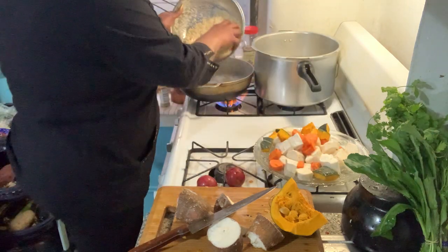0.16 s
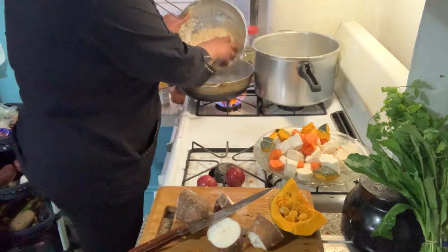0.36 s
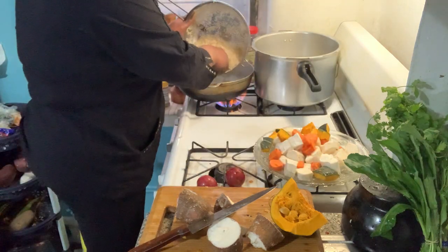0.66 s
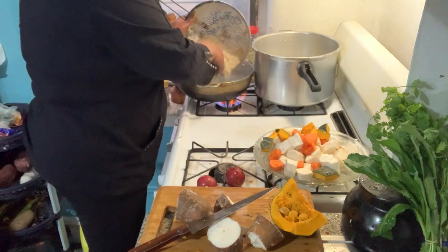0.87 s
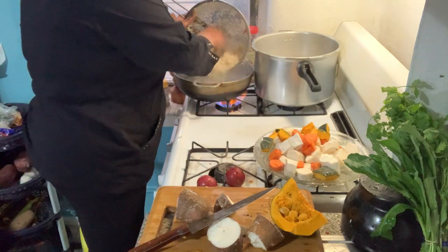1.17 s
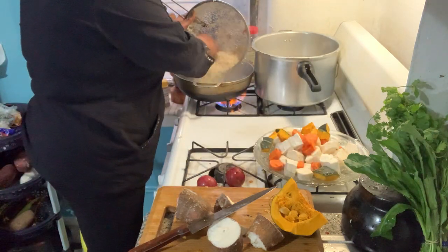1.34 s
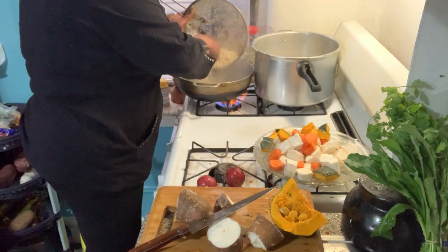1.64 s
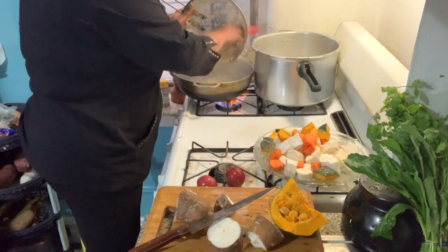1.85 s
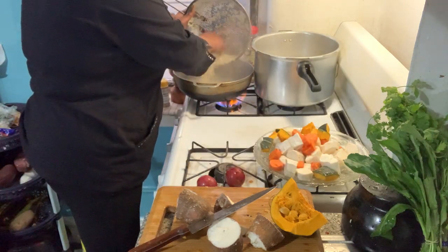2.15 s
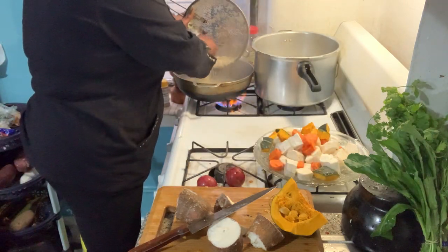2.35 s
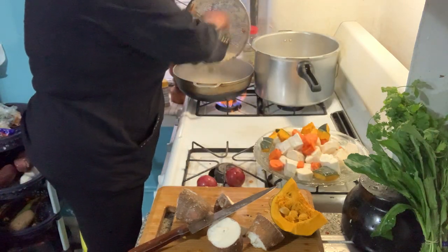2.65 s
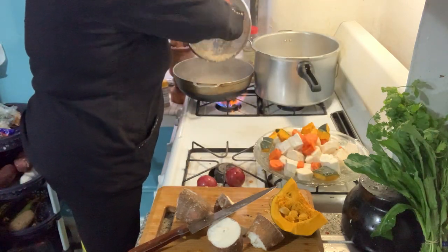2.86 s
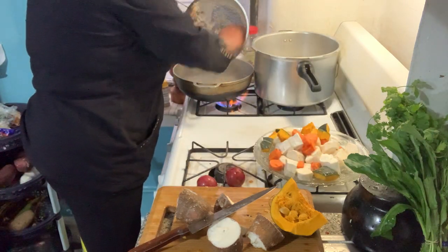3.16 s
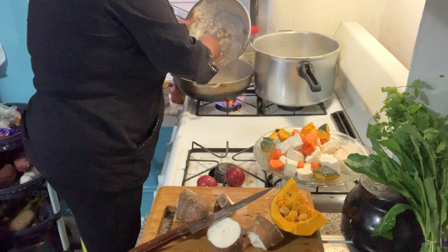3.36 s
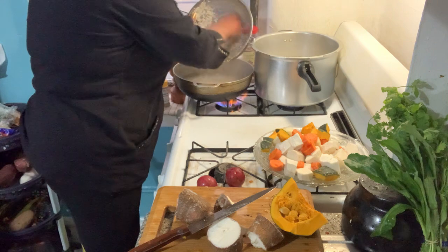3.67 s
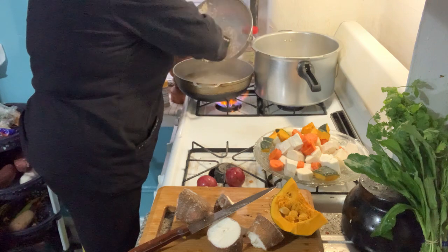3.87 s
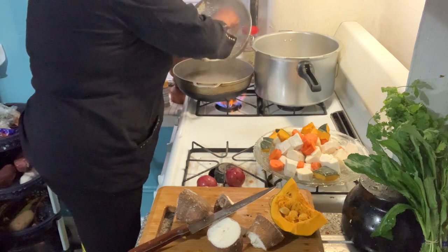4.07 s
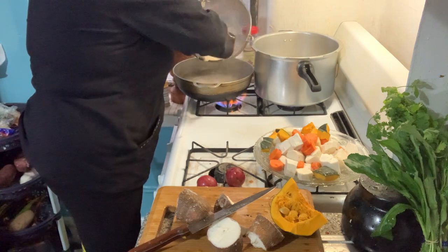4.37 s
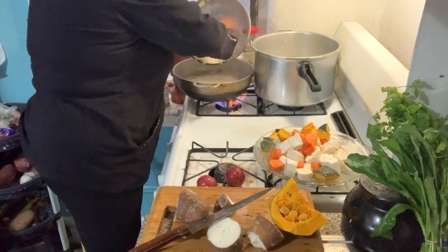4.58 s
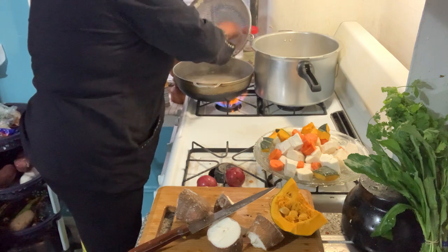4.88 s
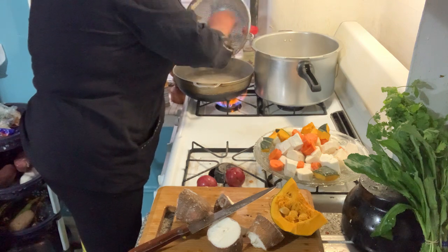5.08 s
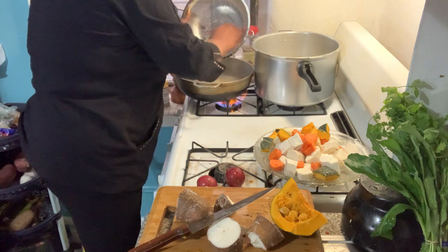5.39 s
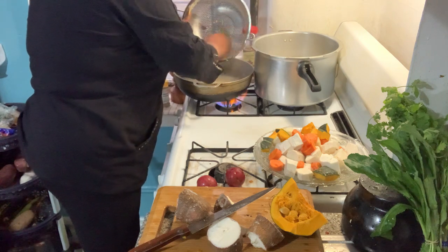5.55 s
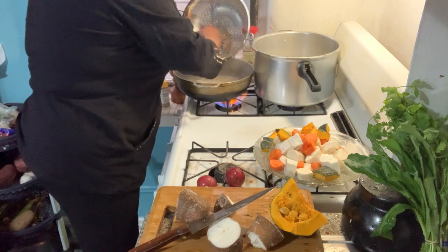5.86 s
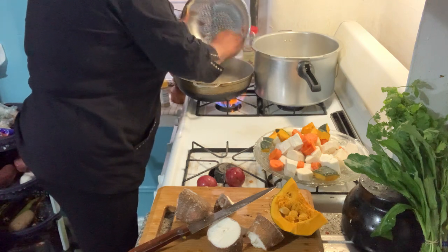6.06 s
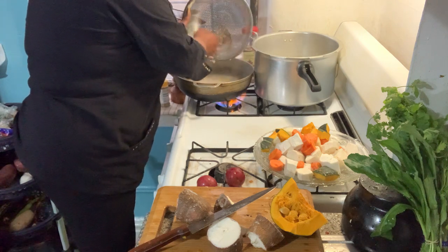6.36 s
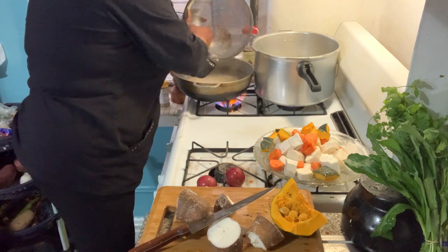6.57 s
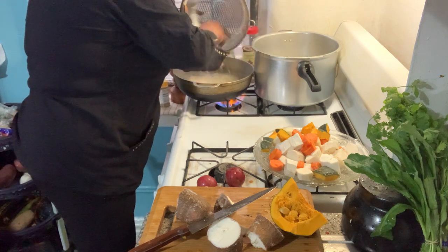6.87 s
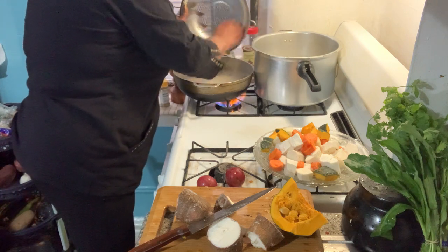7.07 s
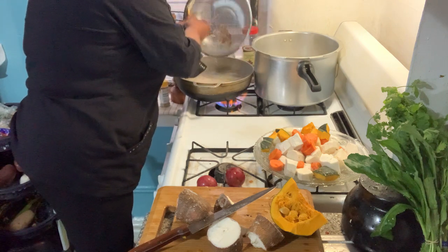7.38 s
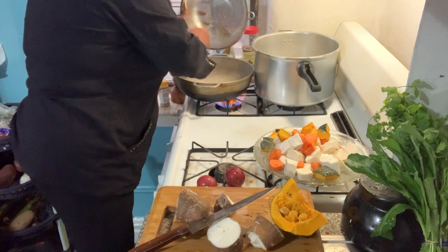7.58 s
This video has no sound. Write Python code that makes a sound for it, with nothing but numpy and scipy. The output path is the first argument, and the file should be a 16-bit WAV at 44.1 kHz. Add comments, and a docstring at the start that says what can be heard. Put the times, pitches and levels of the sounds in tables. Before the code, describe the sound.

Fingers scrape wet rice over a steel mesh strainer in gritty strokes, with wire pings and metallic rim knocks, over a kitchen fan drone and gas hiss.

```python
"""In a hard-walled kitchen a fan drones and whines and a gas flame hisses, all shaped noise and thin tones.
From the start fingers scrape wet rice over a steel mesh strainer above a pan: gritty noise swells stroke by
stroke, dry as if close to the microphone; caught wires ping. Near 3 s the rim knocks, near 6 s it clanks on
the pan: resonances with wall echoes, over soft booms. Near 7 s a wet finger squeaks in harmonics.
The two microphone ports hear deep bass and treble mostly alike but phase-shifted, the middle less alike."""
import sys
import numpy as np
from scipy import signal
from scipy.fft import rfft, irfft, next_fast_len
from scipy.io import wavfile
from scipy.ndimage import uniform_filter1d, map_coordinates

SR = 44100
rng = np.random.default_rng(int(sys.argv[2]) if len(sys.argv) > 2 else 0)


def digitize_waveform(pressure):
    """Quantize a signal to 16-bit integers and store it at the path in sys.argv[1].

    Rows of a 2-D input are taken as channels; values are limited to [-1, 1].
    """
    field = np.atleast_2d(pressure).T
    bounded = np.clip(field, -1, 1)
    quanta = np.round(bounded * 32767).astype(np.int16)
    wavfile.write(sys.argv[1], SR, quanta)


N = 340893

# spectrum of the mesh wires: f/Hz, relative level per Hz/dB
WIRE_FIZZ = [(5000, -11), (7000, -15), (8500, -4.5), (10500, -1), (11500, -2), (12500, -3.5), (13200, -11),
             (14700, -12), (15700, -58)]
# spectrum of the bowl and rice: f/Hz, relative level per Hz/dB
BOWL_RASP = [(1200, -4.5), (2400, -11.5), (3200, -5), (3900, -3.5), (4600, -1), (6000, -2.5), (7200, -5.5),
             (9000, -3.5)]


def amp(db):
    """Gain of a level in dB."""
    return 10 ** (np.asarray(db) / 20)


def unit(x):
    """x at rms 1."""
    return x / np.sqrt(np.mean(x ** 2) + 1e-20)


def along(points, hz):
    """One value per frequency for each column after the Hz, on a log axis."""
    f, *cols = np.transpose(points)
    return np.squeeze([np.interp(np.log(hz + 1), np.log(f + 1), c) for c in cols])


def curves(rows):
    """One value per sample for each column after the time."""
    s, *cols = np.transpose(rows)
    return [np.interp(np.arange(N) / SR, s, c) for c in cols]


def wobble(rate):
    """A smooth random curve, rate knots a second."""
    knots = rng.standard_normal(int(N * rate / SR) + 4)
    return map_coordinates(knots, [np.arange(N) * rate / SR])


def filtered(x, response):
    """x times a complex response of frequency."""
    n = x.shape[-1]
    m = next_fast_len(n + SR // 2)
    return irfft(rfft(x, m) * response(np.fft.rfftfreq(m, 1 / SR)), m)[..., :n]


def coloured(x, spectrum):
    """x given a spectrum closed at both ends, at rms 1."""
    closed = [(spectrum[0][0] / 2, -120), *spectrum, (SR / 2, -120)]
    return unit(filtered(x, lambda hz: amp(along(closed, hz))))


def body(modes):
    """The causal response of a set of (f/Hz, width/Hz, level/dB) resonances, alternating in sign."""
    def response(f):
        total = 0
        for k, (centre, width, db) in enumerate(modes):
            resonance = 1j * f * width / (centre * centre - f * f + 1j * f * width)
            total = total + (-1) ** k * amp(db) * resonance
        return total
    return response


def grit(spread_db, patchy_db):
    """Two streams of tiny slips of unequal size, in patches of random strength."""
    slips = rng.standard_normal((2, N)) * amp(spread_db * rng.standard_normal(N))
    z = signal.stft(slips, nperseg=256)[2]
    field = rng.standard_normal(z.shape[1:])
    field = uniform_filter1d(uniform_filter1d(field, 5, 0), 8, 1)  # smooth over frequency, then time
    return signal.istft(z * amp(patchy_db * unit(field)), nperseg=256)[1][:, :N]


def echoes(x):
    """Two unrelated answers of the kitchen walls: noise tails in which each frequency dies at its own speed."""
    # decay between the hard walls: f/Hz, t60/s
    wall_decay = [(500, 0.41), (2000, 0.3), (5000, 0.34), (8000, 0.26), (11000, 0.2), (14000, 0.053)]
    hz, t, z = signal.stft(rng.standard_normal((2, SR // 2)), SR, nperseg=256)
    fade = amp(-60 * t / along(wall_decay, hz)[:, None])
    tail = signal.istft(z * fade, SR, nperseg=256)[1]
    return signal.fftconvolve(x, tail / np.linalg.norm(tail[0]), axes=1)


def kitchen():
    """Fan noise and tones in the room modes, deep rumble, patchy flame hiss and narrow flickering bands."""
    # fan in the room modes: f/Hz, relative level per Hz/dB
    drone_spectrum = [(25, -39), (45, -20), (60, -5.5), (80, -23), (110, 1), (150, 3), (200, -6),
                      (260, -3.5), (340, 2.5), (400, -9), (560, -14.5), (620, -64), (680, -3.5),
                      (1000, -34)]
    # gas flame: f/Hz, relative level per Hz/dB
    flame_spectrum = [(600, 10), (1000, 1), (2000, -2.5), (3000, -5), (5000, -10.5), (7300, -13),
                      (11000, -21), (13200, -38), (15500, -79)]
    # mean level of the deepest bass: t/s, level/dB
    rumble_level = [(0, -57.5), (1.2, -53.5), (2.5, -54), (3.7, -52.5), (5.5, -56), (6.5, -54.5),
                    (7.73, -60)]
    # narrow bands of the room tone that flicker: f/Hz, width/Hz, mean level/dB
    burble_bands = [(446, 40, -66), (573, 43, -63.5), (747, 49, -63.5), (793, 15, -65.5), (947, 15, -68.5)]
    # blurred fan tones: f/Hz, width/Hz, level/dB
    hum_bands = [(95, 8, -58), (245, 10, -57), (283, 6, -52), (353, 5, -58), (706, 5, -55)]
    # two thin fan tones: t/s, mean level of the lower/dB, of the upper/dB
    whine_level = [(0, -71, -60), (1, -64.5, -65), (2.5, -68, -62), (3.2, -59, -76), (6.8, -59.5, -61),
                   (7.73, -65, -60.5)]
    # their pitches: f/Hz
    whine_hz = [2076, 2160]

    def noise():
        return rng.standard_normal((2, N))

    def band(hz, width_hz):
        return unit(filtered(noise(), body([(hz, width_hz, 0)])))

    drone = amp(-46 + .6 * wobble(3.94)) * coloured(noise(), drone_spectrum)
    deep_bass = coloured(noise(), [(30, -13), (55, 6.0), (75, 1.0)])
    rumble = amp(curves(rumble_level)[0] + 0.56 * wobble(3.64)) * deep_bass
    hiss = coloured(grit(spread_db=1.5, patchy_db=2.5), flame_spectrum)
    flame = amp(-53.0 + 0.32 * wobble(2.2)) * hiss
    burble = sum(amp(db + 5.1 * wobble(7)) * band(hz, width_hz) for hz, width_hz, db in burble_bands)
    hum = sum(amp(db) * band(hz, width_hz) for hz, width_hz, db in hum_bands)
    t = np.arange(N) / SR
    whine = 0
    for hz, db in zip(whine_hz, curves(whine_level)):
        phase = 2 * np.pi * hz * t + .8 * wobble(4) + [[0], [2]]  # 2 rad between the rows
        whine = whine + amp(db + wobble(4)) * np.sin(phase)
    return drone + rumble + flame + burble + hum + whine


def effort():
    """Amplitude of fizz and rasp: each stroke swells to its fastest moment and dies away; powers add."""
    # strokes of the hand over the mesh: fastest moment t/s, rise/s, fall/s, fizz level/dB, rasp over fizz/dB
    hand_strokes = [(.2, 0.16, 0.37, -56, -4.5), (.42, .04, 0.091, -58, -14), (.57, .04, 0.1, -56, -14),
                    (.72, 0.097, 0.49, -51.5, -2.5), (.96, 0.086, 0.16, -51, 1),
                    (1.15, 0.28, 0.12, -54, -23), (1.33, 0.071, 0.12, -50, -7),
                    (1.54, 0.11, 0.13, -46.5, -2.5), (1.82, 0.026, 0.052, -48.5, -18),
                    (2.15, 0.17, 0.15, -46.5, -3.5), (2.33, 0.046, 0.065, -46, -2),
                    (2.45, 0.089, 0.13, -43, -0.5), (2.62, 0.11, 0.073, -45.5, -4),
                    (2.775, 0.045, 0.023, -52, -9), (2.9, 0.047, 0.17, -53, -10),
                    (3.01, 0.049, 0.034, -43.5, -18), (3.08, 0.087, 0.061, -40.5, -7.5),
                    (3.22, 0.063, 0.14, -34, -15.5), (3.31, 0.068, 0.093, -44.5, 0.5),
                    (3.53, 0.052, 0.083, -47, -14), (3.61, 0.059, 0.037, -46, -10),
                    (3.74, 0.055, 0.16, -40, -12), (3.85, .1, 0.14, -42, -16),
                    (3.94, 0.076, 0.072, -40, -12), (4.11, 0.016, 0.1, -45.5, -24),
                    (4.28, 0.1, 0.22, -39.5, -10.5), (4.448, 0.057, 0.02, -62, -16),
                    (4.53, .05, 0.033, -72, -11), (4.69, 0.25, 0.075, -44, -11),
                    (4.955, 0.086, 0.078, -43.5, -8.5), (5.1, 0.065, 0.033, -61, 1),
                    (5.16, 0.022, 0.028, -57, 3), (5.3, 0.089, 0.088, -38.5, -11),
                    (5.6, 0.035, 0.072, -43, -5.5), (5.7, 0.078, 0.042, -53.5, -4),
                    (5.85, 0.023, 0.05, -49, -11), (6.06, .04, 0.036, -65, -9), (6.42, 0.22, 0.1, -47.5, 1),
                    (6.65, 0.11, 0.058, -45.5, 0), (6.79, 0.1, 0.09, -42.5, -2),
                    (7.02, 0.012, 0.039, -53, -4), (7.14, 0.029, .05, -55.5, -1),
                    (7.22, 0.088, 0.079, -46, -4.5), (7.3, .06, .08, -46.5, -2),
                    (7.4, .06, 0.065, -58, -10), (7.35, .02, 0.022, -58, 5), (7.545, 0.035, 0.058, -47, -3),
                    (7.69, .02, .04, -54, -13)]
    # rice shifting between strokes: t/s, fizz level/dB
    settling = [(0, -66.5), (.7, -65), (1.75, -50.5), (1.9, -64.5), (2.7, -62), (3.5, -62.5), (5.5, -57),
                (6.3, -58), (7, -72.5), (7.73, -73)]
    settle_rasp_db = -1  # rasp over the fizz between strokes
    edge_db, roundness = 12.5, 1.29  # drop at the ends of a stroke's rise and fall; shape of its top
    t = np.arange(N) / SR
    power = amp(2 * (curves(settling)[0] + [[0], [settle_rasp_db]]))
    for s, rise, fall, fizz_db, rasp_db in hand_strokes:
        start = max(round((s - 3 * rise) * SR), 0)
        near = slice(start, round((s + 3 * fall) * SR))
        away = np.abs(t[near] - s) / np.where(t[near] < s, rise, fall)
        peak_db = fizz_db + np.array([[0], [rasp_db]])
        power[:, near] += amp(2 * (peak_db - edge_db * away ** roundness))
    return np.sqrt(power)


def scrape():
    """Skin and grains slip over the weave: the wires fizz, the bowl rasps, both stutter together, grains tick."""
    # what a grain rings in the wires: f/Hz, width/Hz, level/dB
    wire_modes = [(3980, 920, -0.5), (4660, 170, 7.5), (5800, 400, 4), (6470, 400, 5)]
    ticks_per_s, tick_db, tick_spread_db = 300, -7, 3.5  # mean rate; level against the rasp effort; spread
    fizz, rasp = effort()
    stutter = wobble(60)
    hits = rng.random(N) < ticks_per_s / SR
    sizes = amp(tick_spread_db * rng.standard_normal(N))
    snaps = hits * sizes * np.sign(rng.standard_normal((2, N)))
    fizz_noise = coloured(grit(spread_db=0.5, patchy_db=2.5), WIRE_FIZZ)
    rasp_noise = coloured(grit(spread_db=0.5, patchy_db=0.5), BOWL_RASP)
    wires_fizz = fizz * amp(1.14 * stutter) * fizz_noise
    bowl_rasps = rasp * amp(2 * stutter + 2.0 * wobble(18)) * rasp_noise
    grains_tick = rasp * amp(tick_db) * unit(filtered(snaps, body(wire_modes)))
    return wires_fizz + bowl_rasps + grains_tick


def catches():
    """A nail or grain catches: each plucks one wire and throws a brief scuff of fizz and rasp."""
    # nails and grains on a wire: t/s, ping drive level/dB, ping f/Hz, scuff level/dB
    caught_wires = [(0.683, -41, 6400, -44), (0.792, -34, 4150, -36.5), (0.838, -35, 5200, -43),
                    (.936, -22.5, 5400, -49), (0.941, -23.5, 4650, -60), (0.99, -36, 5600, -49),
                    (1.066, -34, 6000, -43), (1.244, -51, 4860, -43), (1.329, -33, 3600, -47),
                    (1.485, -40, 5200, -42), (1.555, -34, 5600, -42), (1.673, -33, 4200, -45),
                    (1.808, -48, 4400, -54), (2.316, -28.5, 6000, -38), (2.43, -21, 4600, -36.5),
                    (2.719, -32, 5260, -57), (2.769, -45, 6100, -41), (3.78, -34, 4350, -30),
                    (4.082, -55, 5350, -40), (4.403, -50, 4370, -51), (4.601, -20, 4290, -28.5),
                    (5.148, -38, 6100, -41), (5.591, -31, 6060, -33), (5.829, -40.5, 4800, -55),
                    (6.039, -45, 6020, -57), (6.421, -41, 4600, -37), (6.615, -32, 3900, -48),
                    (6.749, -29, 5760, -48), (7.013, -30, 4900, -45), (7.135, -32, 4800, -48),
                    (7.345, -42, 4890, -37), (7.536, -33, 4550, -50)]
    t60_s, scuff_rasp_db = 0.068, -29  # decay of a catch; rasp over the fizz in its scuff
    ping, scuff = np.zeros((2, N + SR)), np.zeros(N + SR)
    t = np.arange(SR // 5) / SR
    shape = amp(-60 * t / t60_s) * (1 - np.exp(-t / 0.002))
    for s, db, hz, scuff_db in caught_wires:
        start = round(s * SR)
        pluck = shape * rng.standard_normal((2, len(t)))
        ping[:, start:][:, :len(t)] += amp(db) * filtered(pluck, body([(hz, 400, 0)]))
        scuff[start:][:len(t)] += amp(scuff_db) * shape
    fizz = coloured(grit(spread_db=3, patchy_db=1.4), WIRE_FIZZ)
    rasp = coloured(grit(spread_db=3, patchy_db=1.4), BOWL_RASP)
    return ping[:, :N] + scuff[:N] * (fizz + amp(scuff_rasp_db) * rasp)


def knocks():
    """A blow and a short rattle of contacts ring the rim and the pan and clatter; the walls carry the tail."""
    # knocks of the rim: t/s, rim level/dB, extra on the low modes/dB, extra on the ringing pair/dB,
    # pan level/dB, rattle t60/s
    rim_knocks = [(2.796, -3, 4.5, -4, -9.5, 0.02), (2.827, -38, -7, -12, -41, 0.033),
                  (3.056, -10, 1, -0.5, -38, 0.024), (3.102, -13, -0.5, -5, -45, 0.018),
                  (3.404, -21, 3.5, -3, -40, 0.04), (3.448, -30, 10.5, 1, -39.5, 0.027),
                  (3.789, -28, -2.5, -1, -38, 0.055), (4.163, -11, -1, 3.5, -24, 0.039),
                  (4.204, -28, -8, 4, -47, 0.027), (4.592, -8, -1.5, 4.5, -24, 0.029),
                  (6.1312, -13, -22, 1, 1.5, 0.048), (6.192, -40, -10, 0, -14.5, 0.039),
                  (6.223, -40, -10, 0, -21, .04)]
    # resonances of the rim: f/Hz, width/Hz, relative level/dB
    rim_modes = [(1570, 84, -1.5), (1820, 77, 7), (1925, 130, 6), (2370, 30, 4), (2876, 40, -0.5),
                 (3110, 51, -5), (3520, 66, -2), (4360, 116, 6.5), (4630, 150, 5), (5040, 300, -14),
                 (5580, 250, -4.5), (6380, 210, 1)]
    # resonances of the pan: f/Hz, width/Hz, relative level/dB
    pan_modes = [(242, 52, -3.5), (776, 110, -12), (1220, 160, -15.5), (1795, 62, 1.5), (1962, 30, 8.5),
                 (1986, 15, 5), (2040, 22, -2), (2090, 15, 5.5), (2276, 49, -6), (3017, 56, -4),
                 (3460, 80, -6.5), (4000, 790, -16), (4550, 120, -2.5), (5100, 87, -2), (5550, 44, 3),
                 (5510, 45, 0), (5630, 38, 5), (5690, 45, 1), (5880, 64, 3.5), (5820, 53, 4.5),
                 (5920, 83, 5.5), (6230, 54, -3), (6130, 60, -3), (6340, 45, 2), (6480, 150, -4),
                 (7970, 390, 0), (10000, 900, -1), (11100, 150, -15), (11300, 340, -7.5), (14200, 310, -23)]
    ring_db, ring_attack_s = -0.5, .003  # free ringing after the main blow
    rattle_db, contact_spread_db = 1.5, 3  # part driven by the rattle; its contacts are unequal
    walls_db, walls_rise_s = -3.5, .009  # the walls' answer builds up
    rim_blur, pan_blur = 4, 2.5  # the walls return each mode this many times wider
    out, t = np.zeros((2, N + 2 * SR)), np.arange(SR // 5) / SR
    for s, rim_db, low_db, pair_db, pan_db, t60 in rim_knocks:
        shape = amp(-60 * t / t60) * (1 - np.exp(-t / .0027)) ** 2
        steps = np.repeat(rng.standard_normal(len(t) // 30), 30)  # one strength per 30 samples
        contacts = shape * unit(amp(contact_spread_db * steps))
        blow = np.linalg.norm(shape) * (t == 0) * np.ones((2, 1))
        rim = [(hz, w, db + rim_db + low_db * (hz < 2600) + pair_db * (4100 < hz < 5200))
               for hz, w, db in rim_modes]
        pan = [(hz, w, db + pan_db) for hz, w, db in pan_modes]
        # the loose mesh has no pitch of its own
        clatter = [(3300, 1500, max(rim_db - 9.0, pan_db - 27)),
                   (6000, 1700, max(rim_db - 14, pan_db - 7))]
        here = out[:, round(s * SR):]
        for modes, blur in (rim, rim_blur), (pan, pan_blur), (clatter, 1):
            rattle = filtered(contacts * rng.standard_normal((2, len(t))), body(modes))
            ring = filtered(blow, body(modes)) * (1 - np.exp(-t / ring_attack_s)) ** 2
            here[:, :len(t)] += amp(rattle_db) * rattle + amp(ring_db) * ring
            blurred = body([(hz, blur * w, db) for hz, w, db in modes])
            wet = amp(walls_db) * echoes(filtered(blow, blurred))
            wet_t = np.arange(wet.shape[1]) / SR
            here[:, :wet.shape[1]] += wet * (1 - np.exp(-wet_t / walls_rise_s)) ** 2
    return out[:, :N]


def thuds():
    """The stove booms under the two hardest knocks: soft low narrow noise that swells and fades."""
    # booms of the stove: t/s, level at the peak of the swell/dB, f/Hz
    booms = [(2.81, -44.5, 110), (2.82, -43, 190), (6.14, -43, 49.5)]
    swell_s = 0.038  # start to peak
    out = 0
    for s, db, hz in booms:
        u = np.clip(np.arange(N) / SR - s, 0, None) / swell_s
        resonance = body([(hz, .8 * hz, 0)])
        noise = filtered(rng.standard_normal((2, N)), lambda f: resonance(f) ** 2)
        out = out + amp(db) * u * np.exp(1 - u) * unit(noise)
    return out


def squeaks():
    """Regular stick and slip on steel: a brief, slightly rising, fluttering stack of harmonics, with echoes."""
    # squeaks of a wet finger: t/s, starting f/Hz, length/s, level of harmonics 1 to 4/dB before the flutter
    finger_squeaks = [(7.125, 1550, 0.04, -72, -77, -54, -70), (7.195, 1770, 0.02, -52, -69, -53, -62),
                      (7.207, 2050, 0.041, -65, -46.5, -50, -63), (7.293, 1776, 0.03, -53, -55, -51, -62),
                      (7.338, 1630, 0.023, -49, -60, -50, -56)]
    out, flutter = np.zeros((2, N)), amp(2.8 * wobble(120))
    for s, hz, length, *levels_db in finger_squeaks:
        start = round(s * SR)
        t = np.arange(round(length * SR)) / SR
        jitter = .045 * np.cumsum(rng.standard_normal(len(t)))  # rad
        turns = 2 * np.pi * hz * t * (1 + .01 * t / length) + jitter
        stack = sum(amp(db) * np.sin((k + 1) * turns + rng.uniform(0, 2 * np.pi))
                    for k, db in enumerate(levels_db))
        swell = np.sin(np.pi * np.sqrt(t / length))
        out[:, start:][:, :len(t)] += swell * flutter[start:][:len(t)] * stack
    return out + amp(-8) * echoes(out)[:, :N]


def scene():
    """Row 0 is what reaches the left port, row 1 a second sound field of the same kind to mix from."""
    return kitchen() + scrape() + catches() + knocks() + thuds() + squeaks()


def record(dry):
    """The right port mixes a phase-shifted share of the left with the second field, up to a band limit."""
    # right microphone port against the left: f/Hz, likeness 0-1, left leads/rad, left louder/dB
    port_pair = [(40, .98, 0, -1.5), (100, .92, .5, -1.5), (170, .7, 1.4, 4), (260, .55, 2.1, 14),
                 (340, .5, 1.8, 11), (430, .3, 2.4, 2), (520, .75, 2.8, 0), (670, .85, 3, .5),
                 (706, .985, 3.14, .5), (750, .85, 3.2, .5), (950, .3, 3.3, 3), (2500, .25, 5.2, 2.5),
                 (5000, .25, 4.6, 2.5), (6900, .15, 2.6, 1.5), (7500, .6, 2.6, 1), (8200, .85, 2.8, 0),
                 (8800, 1, np.pi, 0), (9500, 1, np.pi, 0), (9800, .92, 3.5, 0), (12800, .88, 5.7, 0),
                 (13200, 1, 2 * np.pi, 0)]
    top_hz = 15800  # nothing passes above

    def right(hz):
        alike, lead, left_db = along(port_pair, hz)
        alike = np.clip(alike, 0, 1)
        shares = np.array([alike * np.exp(-1j * lead), np.sqrt(1 - alike ** 2)])
        return amp(-left_db) * shares

    pair = np.array([dry[0], filtered(dry, right).sum(axis=0)])
    return filtered(pair, lambda hz: hz < top_hz)


dry = scene()
out = record(dry)
digitize_waveform(out)
```